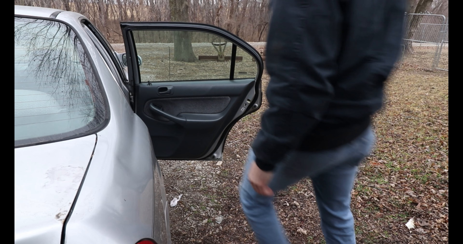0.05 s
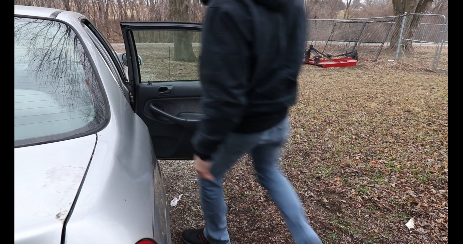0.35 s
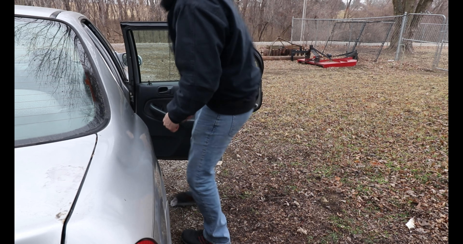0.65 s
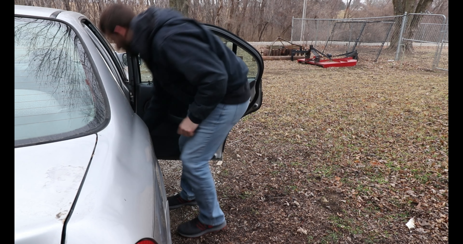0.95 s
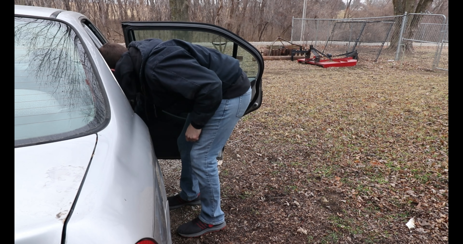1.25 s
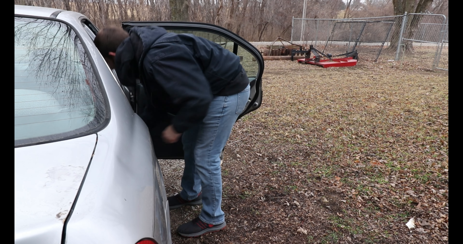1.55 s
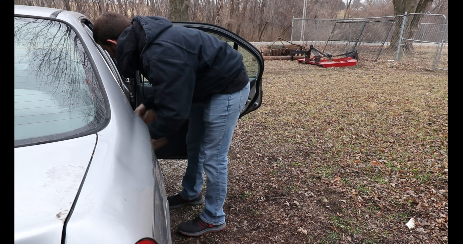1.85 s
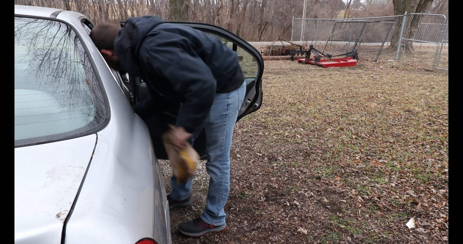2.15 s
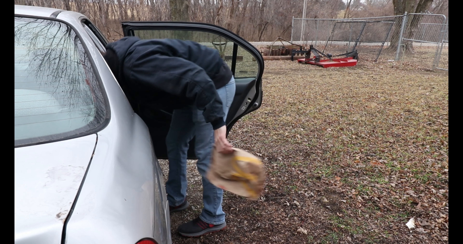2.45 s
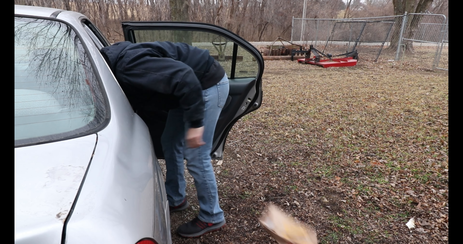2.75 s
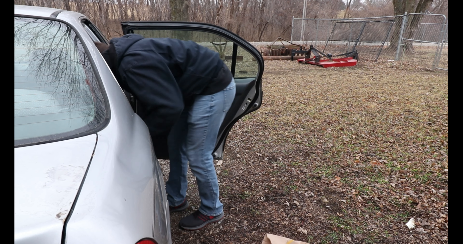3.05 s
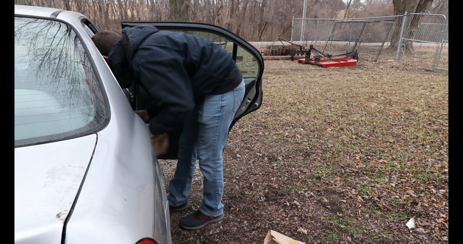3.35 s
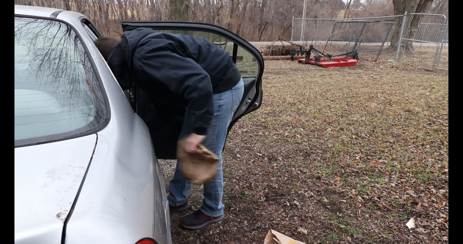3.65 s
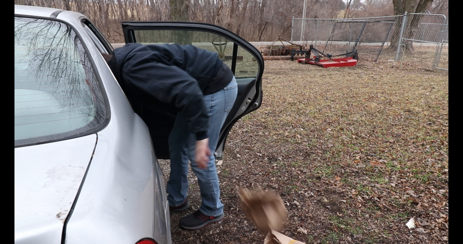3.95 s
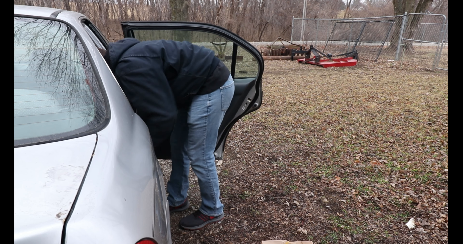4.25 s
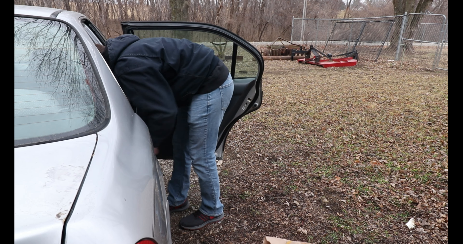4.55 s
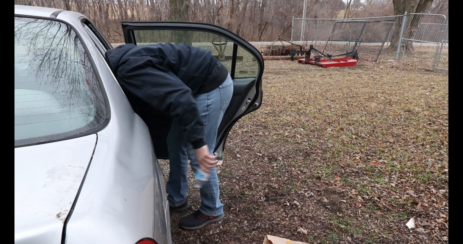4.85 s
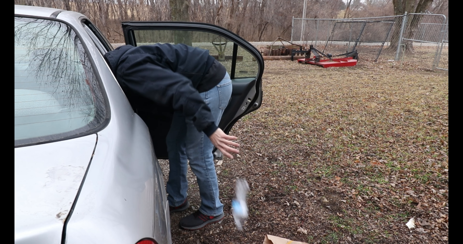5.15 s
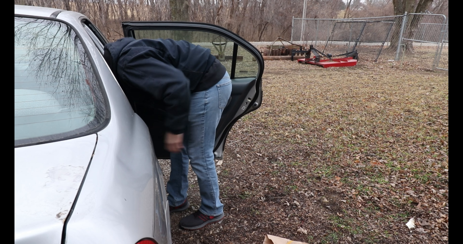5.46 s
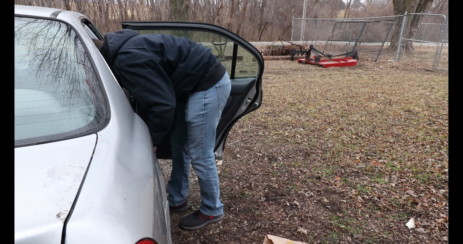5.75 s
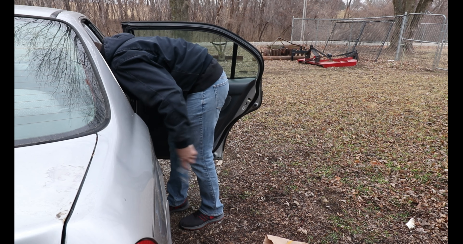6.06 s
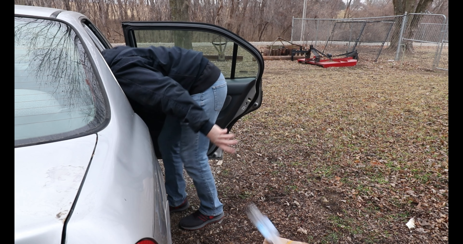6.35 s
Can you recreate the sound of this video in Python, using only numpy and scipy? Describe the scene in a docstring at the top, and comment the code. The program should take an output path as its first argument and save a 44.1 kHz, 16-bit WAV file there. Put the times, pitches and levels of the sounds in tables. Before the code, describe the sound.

Footsteps on dry leaves, then paper bags crinkle and crash to the ground, followed by plastic bottles crackling and knocking.

```python
"""In faint wind, someone scuffs and steps over dry leaves to a parked car and clears out the back seat.
Two paper bags, one after the other, crinkle as they are grabbed, crash onto the ground with a thump
of trapped air and settle. A tossed plastic bottle whistles faintly and lands with a crackle and a
knock; then another crackles and knocks as a hand grabs it. The cabin answers the impacts briefly,
and the loudest cracks overload the microphone."""
import sys
import numpy as np
from scipy import signal
from scipy.fft import rfft, irfft, next_fast_len
from scipy.io import wavfile
from scipy.ndimage import uniform_filter1d, map_coordinates

SR = 44100
rng = np.random.default_rng(int(sys.argv[2]) if len(sys.argv) > 2 else 0)


def inscribe(sig):
    """Save sig as 16-bit PCM at rate SR to the path in sys.argv[1].

    A 1-D sig is mono; a 2-D sig holds one channel per row.
    Samples are clipped to [-1, 1] before scaling.
    """
    pcm = np.round(np.clip(np.atleast_2d(sig).T, -1, 1) * 32767)
    wavfile.write(sys.argv[1], SR, pcm.astype(np.int16))


N = 286209
HZ = np.fft.rfftfreq(8192, 1 / SR)  # frequency grid of the filters
FRAMES = np.arange(N // 256 + 2) * 256 / SR  # time grid of the rustles, in seconds
# The tone of crunching paper. Each row: frequency in Hz, relative level in dB.
PAPER_CRUNCH = [(30, -32), (90, -28), (190, -13.5), (290, -16.5), (390, 2), (520, 0), (780, -1),
                (1150, -8.5), (2000, -6), (4000, -10), (6600, -17.5), (8300, -16.5), (10200, -28.5),
                (12500, -22), (16000, -34)]


def amp(db):
    """Decibels to gain."""
    return 10 ** (np.asarray(db) / 20)


def unit(x):
    """Scale to rms 1."""
    return x / np.sqrt(np.mean(x ** 2) + 1e-20)


def along(points, hz):
    """Read a curve of (Hz, value) points on a log frequency axis."""
    f, v = np.transpose(points)
    return np.interp(np.log(hz + 1), np.log(f + 1), v)


def wobble(rate):
    """A smooth random curve with rate knots a second."""
    knots = rng.standard_normal(int(N * rate / SR) + 4)
    return map_coordinates(knots, [np.arange(N) * rate / SR])


def coloured(x, gain):
    """Minimum-phase EQ with the given gain on the HZ grid."""
    cepstrum = irfft(np.log(np.maximum(gain, 1e-6)))
    half = len(cepstrum) // 2
    cepstrum[1:half] *= 2
    cepstrum[half + 1:] = 0
    return signal.fftconvolve(x, irfft(np.exp(rfft(cepstrum)))[:half])[:len(x)]


def registers(gain):
    """The share of a spectrum's power in its lows, mids and highs, in dB."""
    # The three registers. Each row: lower edge in Hz, upper edge in Hz.
    edges = [(150, 650), (650, 4000), (4000, 16000)]
    power = np.array([np.sum(gain[(HZ > low) & (HZ < high)] ** 2) for low, high in edges])
    return 10 * np.log10(power / np.sum(gain ** 2))


def blend(hz):
    """Weights that join three register levels into one smooth EQ curve."""
    # The frequencies in Hz at which the low, middle and high levels hold.
    pivots = [434, 1326, 5840]
    return np.transpose([along(list(zip(pivots, row)), hz) for row in np.eye(3)])


def outdoors(air_db=-54, wind_db=-1):
    """Faint, wavering open air, with light wind rumbling on the microphone."""
    # The tones of air and wind. Each row: frequency in Hz, relative level in dB.
    air_tone = [(59, -32), (100, -12.5), (140, -3.5), (177, -12.5), (206, -8), (283, -6), (315, -10.5),
                (350, -7.5), (547, -12), (836, -10), (1080, -11), (1360, -13), (6290, -26), (8400, -24),
                (10200, -28), (14400, -26.5), (16000, -48)]
    wind_tone = [(15, -4), (35, -7), (62, -10), (85, -10), (120, -11.5), (200, -35), (500, -96)]
    # The gusts. Each row: time in seconds, relative level in dB.
    wind_levels = [(0, -49.5), (.38, -51), (.5, -41.5), (.65, -51), (1.5, -50), (2.2, -56.5), (3.2, -55.5),
                   (3.9, -63), (4.4, -59), (4.85, -51.5), (5.198, -56.5), (6.49, -56.5)]
    drift_db = wobble(11)
    air = unit(coloured(rng.standard_normal(N), amp(along(air_tone, HZ))))
    rumble = unit(coloured(rng.standard_normal(N), amp(along(wind_tone, HZ))))
    gusts_db = np.interp(np.arange(N) / SR, *np.transpose(wind_levels))
    return amp(air_db + drift_db) * air + amp(wind_db + gusts_db) * rumble


def creases(rate, spread_db, cycles, slide_db):
    """Tiny folds pop at random, each ringing briefly at its own pitch, over the hiss of sliding."""
    when, pitch, size, phase = rng.random((int(rate * N / SR), 4)).T[:, :, None]
    hz = 350 * (15000 / 350) ** pitch
    n = np.arange(320)
    # amplitude rises with pitch so that short and long rings together are white
    height = hz * amp(spread_db * np.minimum(-np.log(1 - size), 3.5))
    rings = height * np.exp(-n * hz / (SR * cycles)) * np.sin(2 * np.pi * (hz * n / SR + phase))
    pops = np.bincount(((when * N).astype(int) + n).ravel(), rings.ravel(), N)[:N]
    return unit(unit(pops) + amp(slide_db) * rng.standard_normal(N))


def strokes(rows, roundness=1.38):
    """Power in the three registers: each stroke swells 20 dB over its rise and dies 20 dB over its fall."""
    power = np.zeros((3, len(FRAMES)))
    for s, db, rise, fall, hollow_db, crisp_db in rows:
        away = np.maximum((s - FRAMES) / rise, (FRAMES - s) / fall)
        power += amp(db - 20 * away ** roundness + np.array([[hollow_db], [0], [crisp_db]])) ** 2
    return power


def rustle(power, drive, hollow_db, mid_db, crisp_db, patchy_db):
    """Movement shapes a papery friction; each shift favours other pitches for a moment."""
    # The tone of rubbing paper. Each row: frequency in Hz, relative level in dB.
    friction_tone = [(59, -42.5), (100, -12.5), (206, -9), (335, -3.5), (373, -7), (558, -2.5), (1080, -3),
                     (1760, -3.5), (2270, -6.5), (5190, -14.5), (6290, -20), (8110, -16), (10200, -30),
                     (13200, -25.5), (16000, -37)]
    gain = amp(along(friction_tone, HZ))
    hz, _, friction = signal.stft(unit(coloured(drive, gain)), SR, nperseg=512)
    trim_db = [hollow_db, mid_db, crisp_db] - registers(gain)
    levels_db = 10 * np.log10(power + 1e-12) + trim_db[:, None]
    patches = uniform_filter1d(rng.standard_normal(friction.shape), size=5, axis=0)
    patches = unit(uniform_filter1d(patches, size=4, axis=1))
    shaped = friction * amp(blend(hz) @ levels_db + patchy_db * patches)
    return signal.istft(shaped, SR, nperseg=512)[1][:N]


def leaf_scuffs(crinkle):
    """Soles drag over dry leaves."""
    # Each row: peak time in seconds, relative level in dB, rise and fall in seconds, lows and highs in dB.
    drags = [(.07, -55.5, .25, 0.19, -1, 10), (.37, -45.5, 0.22, 0.38, -2.5, 2.5),
             (.805, -29.5, 0.048, 0.023, -27, 7.5), (.88, -36, 0.1, 0.093, 5.5, -6),
             (1, -36.5, 0.1, 0.18, 3.5, -1.5), (1.215, -44.5, 0.097, 0.11, 4.5, -1)]
    return rustle(strokes(drags), crinkle, hollow_db=-5, mid_db=-3.5, crisp_db=-12.5, patchy_db=0.5)


def cracks(rows, tone, base_t60, doubling_db, panel_db, panel_octaves, swell, grit):
    """Each crack is a short avalanche of clicks that swells, dies and rings the panel which gave way."""
    out, t = np.zeros(N + SR), np.arange(SR // 6) / SR
    tone_db, slope = along(tone, HZ), blend(HZ)
    for s, db, centre_hz, thump_db, crisp_db in rows:
        t60 = base_t60 * 2 ** (thump_db / doubling_db)  # a heavier thump lasts longer
        panel = np.exp(-.5 * (np.log2((HZ + 1) / centre_hz) / panel_octaves) ** 2)
        gain = amp(tone_db + panel_db * panel)
        gain *= amp(slope @ ([thump_db, 0, crisp_db] - registers(gain)))  # lows and highs against mids
        clicks = rng.standard_normal(len(t)) * np.exp(grit * rng.standard_normal(len(t)))
        envelope = amp(-60 * t / t60) * (1 - np.exp(-t / (swell * t60)))
        crack = coloured(clicks * envelope, gain)
        loudest = np.sqrt(uniform_filter1d(crack ** 2, size=176).max())  # rms over 4 ms
        out[round(s * SR):][:len(t)] += amp(db) * crack / loudest
    return out[:N]


def footsteps():
    """Shoes crush leaves and grit into soft ground."""
    # Each row: start in seconds, level in dB, ring in Hz, thump and crispness in dB.
    footfalls = [(.351, -30, 870, 7, -20), (.365, -26.5, 670, 4, -38), (.407, -37.5, 1500, -16, -23),
                 (.421, -35.5, 700, 1, -28), (.651, -42, 1920, -3, -11.5), (.874, -30.5, 845, -17, -40),
                 (.889, -16, 1240, -11, -27), (.909, -33, 376, 21, -7), (.982, -31.5, 1570, -1, 1),
                 (1.013, -35.5, 1200, 5, 0), (1.188, -36.5, 1580, -8, -16), (1.211, -29.5, 1200, 2, -7)]
    # The tone of soft ground. Each row: frequency in Hz, relative level in dB.
    soil_tone = [(30, -36), (80, -17), (150, -14), (260, -5), (400, -3.5), (700, -2.5), (1300, -1.5),
                 (2000, -7.5), (4000, -16.5), (8300, -20.5), (10200, -33), (16000, -32)]
    return cracks(footfalls, soil_tone, base_t60=0.034, doubling_db=80,
                  panel_db=8.0, panel_octaves=0.29, swell=0.047, grit=0.77)


def paper_snaps():
    """The loudest folds of a grabbed bag snap through."""
    # Each row: start in seconds, relative level in dB, ring in Hz, thump and crispness in dB.
    snaps = [(1.345, -19.5, 1790, -9.5, -6.5), (1.5445, -18, 1060, -15, -12.5),
             (1.6695, -17, 1470, -26, -13.5), (1.912, -20.5, 3070, -5, 12), (1.938, -29, 826, -9, -23),
             (2.002, -22.5, 2800, 0, 19), (2.03, -26, 890, -16, -18), (2.046, -24.5, 1640, -18, -14),
             (2.1, -25, 870, -27, -28.5), (2.141, -31, 2930, -14, -7), (2.244, -25, 2110, -34, -13),
             (2.384, -22, 870, -19, -23), (2.391, -22.5, 875, -27, -37), (2.566, -24, 810, -14, -16),
             (2.593, -28.5, 800, -12, -25), (2.622, -20, 660, -15, -32), (2.674, -28, 780, -19, -47),
             (2.753, -21, 1060, -16, -22), (2.761, -20.5, 1020, -2, -23), (3.0186, -31, 560, 11, -2),
             (3.0486, -20.5, 1170, -4, -32), (3.063, -21.5, 630, 4, -18), (3.173, -35, 1560, -7, 9),
             (3.242, -30, 2080, 6, -2), (3.4425, -22, 1930, -3, -2), (3.457, -20.5, 780, -15, -7),
             (3.5455, -21, 1660, -9, -10), (3.637, -26.5, 1690, -9, -15), (3.745, -30.5, 1800, -12, -24),
             (4.239, -24.5, 1080, -15, -9), (4.264, -23, 584, 3, -36), (4.421, -22, 2620, 3, -11),
             (4.473, -27, 524, 3.5, -5), (4.555, -28.5, 1340, -3, -15.5), (4.648, -31.5, 730, -17, -13),
             (4.662, -24, 1660, -16, -13), (4.7045, -26.5, 1070, 5, -20), (4.826, -36.5, 1800, -13, -14),
             (5.058, -37.5, 1090, -30, -32)]
    return amp(-2.5) * cracks(snaps, PAPER_CRUNCH, base_t60=0.032, doubling_db=46,
                              panel_db=13.5, panel_octaves=0.2, swell=0.022, grit=0.25)


def clumps(rate, depth_db, life_s):
    """One fold sets off its neighbours: the crinkling jumps at random moments and dies back."""
    kicks = (rng.random(N) < rate / SR) * rng.exponential(size=N)
    surge = signal.lfilter([1], [1, -np.exp(-1 / (life_s * SR))], kicks)
    return amp(depth_db * np.minimum(surge, 2))


def bag_rustle(crumple):
    """Tugs and swings of a bag swell over the dull, steady rustle of paper being shifted about."""
    # Each row: peak time in seconds, relative level in dB, rise and fall in seconds, lows and highs in dB.
    tugs = [(1.45, -38.5, 0.039, 0.046, 0, 5), (1.53, -40.5, 0.099, 0.059, 12, 2),
            (1.61, -40, 0.035, 0.018, 10.5, 5), (1.685, -32, .04, .16, -4, 0),
            (1.83, -36, 0.015, 0.19, -19, -1.5), (1.92, -27, 0.019, 0.067, -1, -2),
            (2.005, -27.5, 0.092, 0.082, -2.5, -4), (2.29, -32.5, 0.2, 0.13, -4, -1.5),
            (2.54, -34, 0.12, 0.094, -1, 3), (2.775, -33.5, 0.033, 0.086, 4, -9),
            (3.07, -31, 0.11, 0.15, -1, -7), (3.38, -37.5, .11, 0.081, 4.5, 5),
            (3.46, -27, 0.046, 0.068, -6, 0.5), (3.58, -37, .05, .07, 3.5, 9.5),
            (3.75, -41.5, 0.052, 0.12, -18, -3.5), (3.875, -34, 0.074, 0.024, -4, 1.5),
            (3.91, -50, .04, 0.23, 3.5, -5), (4.175, -23, 0.081, 0.1, -1, -4.5),
            (4.35, -37.5, 0.052, 0.24, 1, 2), (4.425, -32, 0.074, 0.068, -6, -3.5),
            (4.67, -35.5, 0.059, 0.067, 1.5, -6), (4.745, -37.5, 0.083, 0.058, 0.5, -5.5)]
    # One list for each spell of rummaging. Each row: time in seconds, relative level in dB.
    spells = [
        [(1.36, -41), (1.56, -42.5), (1.91, -37.5), (2.56, -49.5), (2.96, -34), (3.15, -42.5), (3.55, -38.5),
         (3.69, -40), (3.89, -60)],
        [(4.18, -49), (4.26, -35.5), (4.33, -36.5), (4.476, -38), (4.588, -42.5), (4.686, -47), (4.81, -47),
         (4.87, -50)],
    ]
    effort = sum(amp(np.interp(FRAMES, *np.transpose(spell), left=-np.inf, right=-np.inf))
                 for spell in spells)
    shifting = np.outer(amp([-2, -2, -8.5]), effort) ** 2  # lows, mids, highs
    return rustle(strokes(tugs) + shifting, crumple, hollow_db=-7.5, mid_db=-1, crisp_db=-6, patchy_db=2.5)


def bag_crashes():
    """The bags hit the ground and collapse."""
    # Each row: start in seconds, relative level in dB, ring in Hz, thump and crispness in dB.
    landings = [(2.89, -18, 2280, -24, -11), (2.8962, -6, 2220, -15, -17.5), (2.8975, -7.5, 800, 2.5, -26),
                (2.901, -11.5, 436, -8.5, -8), (2.91, -21, 2820, -22, 6), (2.9255, -28, 640, 9, -27),
                (4.082, -21, 420, -1, -8), (4.106, -12.5, 1400, -7.5, -3.5), (4.121, -11, 1380, -6.5, -8),
                (4.14, -19, 580, -1, -6), (4.164, -14, 595, 5, 0)]
    return amp(-2.5) * cracks(landings, PAPER_CRUNCH, base_t60=0.076, doubling_db=82,
                              panel_db=4.5, panel_octaves=0.13, swell=0.028, grit=0.56)


def knocks(rows, modes, contact_s):
    """A blow rings a container's air and walls; harder contact favours the higher modes."""
    out, t = np.zeros(N + SR), np.arange(SR // 3) / SR
    attack = 1 - np.exp(-t / contact_s)
    for s, db, hardness in rows:
        for hz, mode_db, t60 in modes:
            strength_db = db + mode_db + hardness * np.log2(hz / 474) + rng.standard_normal()
            ring = amp(strength_db - 60 * t / t60) * np.sin(2 * np.pi * hz * t)
            out[round(s * SR):][:len(t)] += ring * attack
    # small containers radiate little bass
    return signal.sosfilt(signal.butter(3, 215, "highpass", fs=SR, output="sos"), out[:N])


def bag_thumps():
    """The air trapped in a bag thumps as it lands."""
    # Each row: start in seconds, relative level in dB, hardness in dB per octave.
    blows = [(2.898, -13, 8.5), (4.122, -15, -20), (4.168, -16, -10)]
    # The bag's modes. Each row: pitch in Hz, relative level in dB, seconds to fade by 60 dB.
    modes = [(346, -6.5, 0.017), (400, -2.5, 0.015), (675, -4.5, 0.051), (980, -3, 0.0098),
             (2450, -2, 0.011)]
    return knocks(blows, modes, contact_s=0.00077)


def bag_settling(crumple, centre_hz=560, width_hz=130):
    """The last creases of a fallen bag ring the air inside it."""
    # Each row: peak time in seconds, level in dB, half-length in seconds.
    swells = [(3.088, -33.5, 0.044), (4.222, -35, 0.079)]
    t = np.arange(N) / SR
    hollow = unit(coloured(crumple, 1 / (1 + ((HZ - centre_hz) / width_hz) ** 2)))
    return hollow * sum(amp(db) * np.exp(-((t - s) / half_s) ** 2) for s, db, half_s in swells)


def bottle_whistle(db=-57, centre_hz=1100, width_hz=130, peak_s=5.19, half_s=0.19):
    """A faint airy whistle while the tossed bottle flies."""
    band = coloured(rng.standard_normal(N), 1 / (1 + ((HZ - centre_hz) / width_hz) ** 2))
    return amp(db) * unit(band) * np.exp(-((np.arange(N) / SR - peak_s) / half_s) ** 4)


def bottle_crackle():
    """Thin plastic walls buckle as the tossed bottle lands, then as a hand grabs another."""
    # Each row: start in seconds, level in dB, ring in Hz, thump and crispness in dB.
    dents = [(5.3412, -22.5, 1340, -17.5, -8), (5.3545, -26.5, 2600, -21, 14),
             (5.3665, -26.5, 1380, -15, -15), (5.3775, -22, 2550, -19, 2), (5.404, -24, 2580, -11, -9),
             (5.417, -20, 1400, -29, -3.5), (5.458, -13, 1100, 1, -19), (5.488, -22, 1060, -7, -16),
             (5.664, -35, 1020, -5, -23), (5.7275, -28, 2400, -16, -23), (5.734, -23.5, 2360, -19.5, -19.5),
             (5.8437, -16, 2030, -15.5, -11.5), (5.86, -15, 1780, 0, -12.5), (5.864, -7.5, 2260, -18, -2),
             (5.9674, -6, 4220, -12.5, 7), (6.1, -37.5, 1460, -14, -19)]
    # The tone of thin plastic. Each row: frequency in Hz, relative level in dB.
    plastic_tone = [(100, -66), (270, -25), (400, 14), (500, 9.5), (750, 2.5), (1400, 1), (3000, 4),
                    (6500, 0), (8600, 2), (10200, -10.5), (12500, -5), (16000, -14)]
    return cracks(dents, plastic_tone, base_t60=0.074, doubling_db=9.5,
                  panel_db=4, panel_octaves=0.46, swell=0.033, grit=0.75)


def bottle_friction():
    """A soft sliding hiss swells under the landing and the grab."""
    # Each row: peak time in seconds, relative level in dB, rise and fall in seconds, lows and highs in dB.
    rubs = [(5.42, -38, 0.082, 0.07, -3.5, 2.5), (5.54, -45.5, 0.19, 0.52, -4.5, -1.5),
            (5.91, -46.5, .04, 0.58, -5, -4.5)]
    return rustle(strokes(rubs), rng.standard_normal(N), hollow_db=-3, mid_db=-3, crisp_db=-11, patchy_db=2)


def bottle_knocks():
    """The air in a bottle rings: loudest as the tossed one lands, softer as the other is grabbed."""
    # Each row: start in seconds, relative level in dB, hardness in dB per octave.
    blows = [(5.4665, 0, -1.5), (5.665, -34, -16.5), (5.844, -28, -9), (5.866, -11, 3.5),
             (5.969, -17.5, 13.5)]
    # The bottle's modes. Each row: pitch in Hz, relative level in dB, seconds to fade by 60 dB.
    modes = [(258, -19.5, 0.13), (387, -26, .03), (468, -0.5, 0.064), (597, -4, 0.045), (642, -8.5, 0.021),
             (765, -27, 0.042), (988, -12.5, 0.046), (1020, -14, 0.031), (1360, -10, 0.02),
             (1750, -30, 0.024), (6260, -79, .15)]
    return knocks(blows, modes, contact_s=0.0007)


def cabin(x, wet_db, echo_db, echo_s=0.028):
    """Add a short diffuse tail from the car, and one faint echo from nearby."""
    # The cabin's decay. Each row: frequency in Hz, seconds to fade by 60 dB.
    decay_times = [(200, 0.12), (500, 0.3), (2000, 0.17), (6500, 0.31), (14000, 0.075)]
    hz, t, noise = signal.stft(rng.standard_normal(SR // 2), SR, nperseg=256)
    tail = signal.istft(noise * amp(-60 * t / along(decay_times, hz)[:, None]), SR, nperseg=256)[1]
    answer = amp(wet_db) * np.pad(tail / np.linalg.norm(tail), (SR // 250, 0))  # 4 ms pre-delay
    answer[round(echo_s * SR)] += amp(echo_db)
    return x + signal.fftconvolve(x, answer)[:N]


def scene():
    """Steps, paper and bottles in the open air; only the impacts ring in the cabin."""
    crunches = footsteps() + paper_snaps() + bag_crashes()
    plastic = bottle_crackle()
    crinkle = creases(rate=2000, spread_db=3.0, cycles=1.8, slide_db=3) * amp(1.2 * wobble(110))
    crumple = crinkle * clumps(rate=46, depth_db=3.5, life_s=0.007)
    friction = bag_rustle(crumple) + leaf_scuffs(crinkle) + bottle_friction()
    steps_and_bags = cabin(crunches + bag_thumps(), wet_db=-17, echo_db=-21)
    bottles = cabin(plastic + bottle_knocks(), wet_db=-19, echo_db=-24)
    mix = steps_and_bags + bottles + friction + bag_settling(crumple) + bottle_whistle() + outdoors()
    return mix[None]


def record(dry):
    """The microphone flattens the highest peaks and keeps nothing above its band limit."""
    top_hz = 15750
    clipped = dry / (1 + np.abs(dry) ** 8) ** (1 / 8)
    size = next_fast_len(N + SR // 4)
    passband = 1 / np.sqrt(1 + (np.fft.rfftfreq(size, 1 / SR) / top_hz) ** 160)
    return irfft(rfft(clipped, size) * passband, size)[..., :N]


dry = scene()
out = record(dry)
inscribe(out)
```